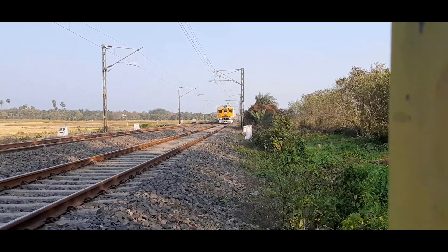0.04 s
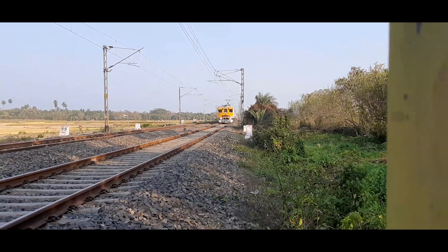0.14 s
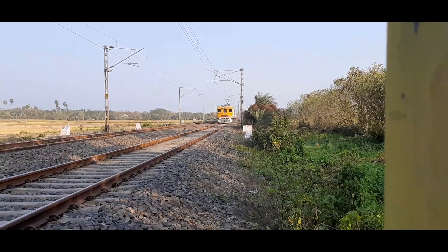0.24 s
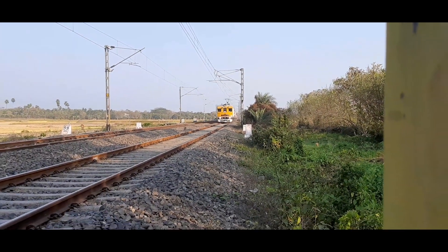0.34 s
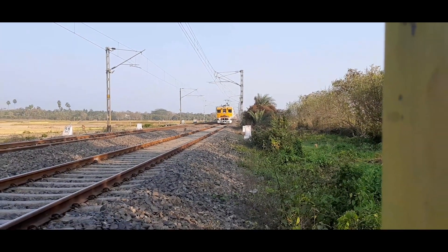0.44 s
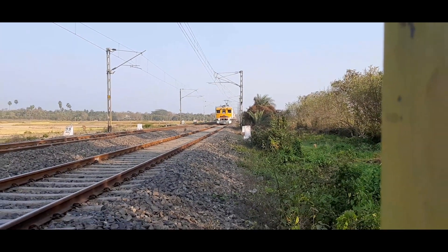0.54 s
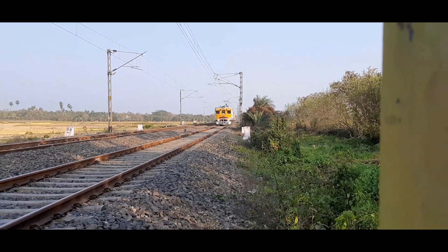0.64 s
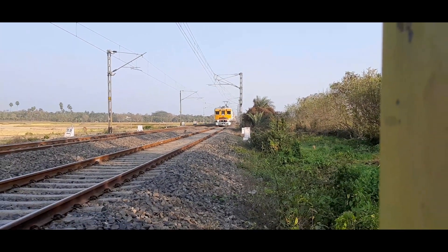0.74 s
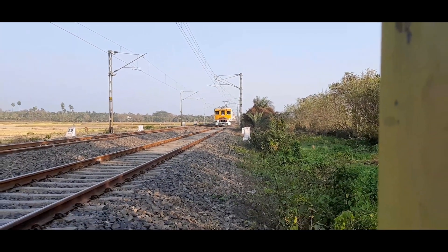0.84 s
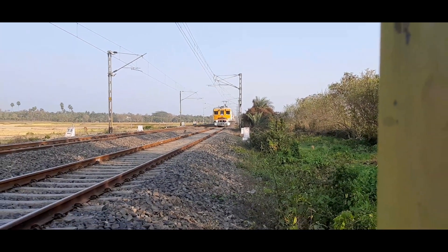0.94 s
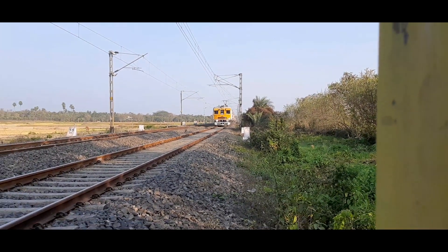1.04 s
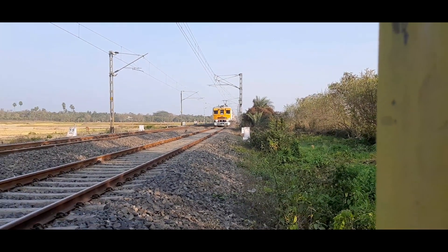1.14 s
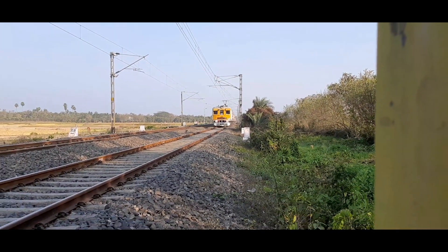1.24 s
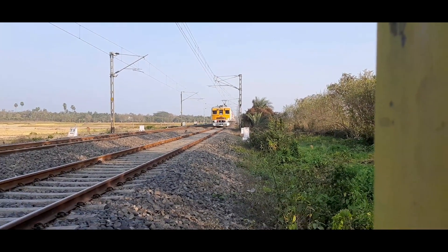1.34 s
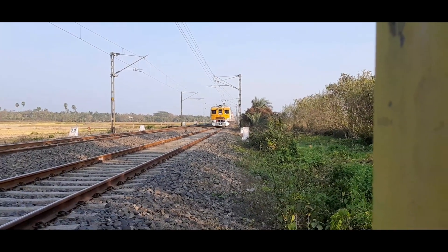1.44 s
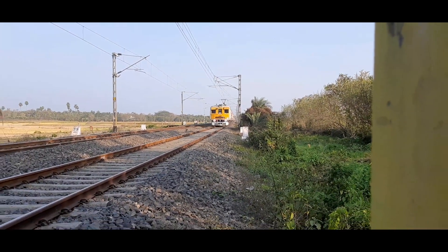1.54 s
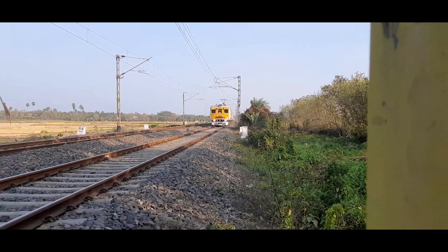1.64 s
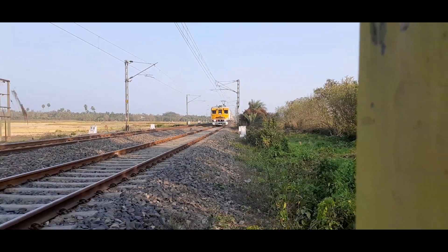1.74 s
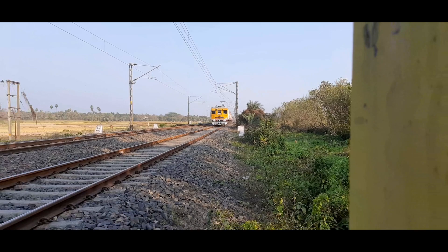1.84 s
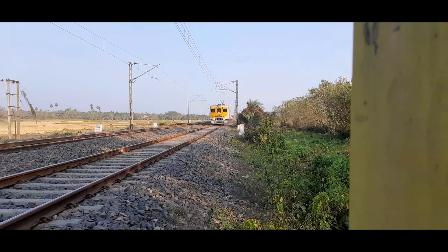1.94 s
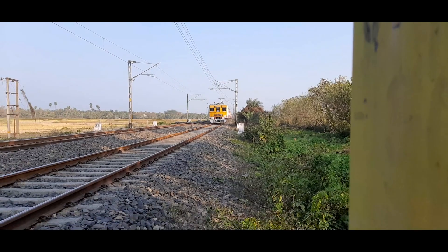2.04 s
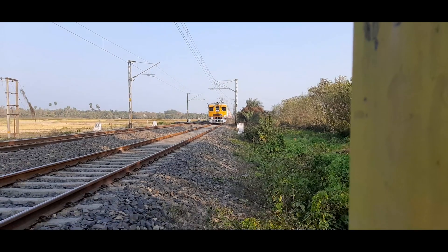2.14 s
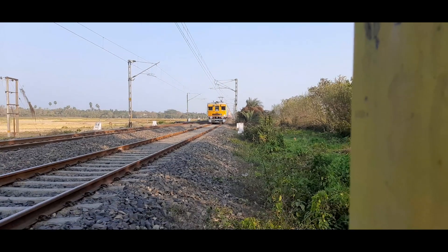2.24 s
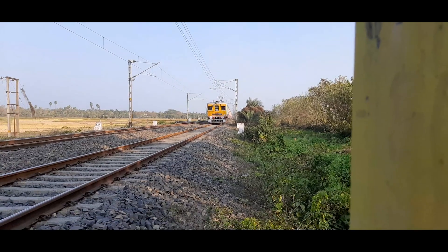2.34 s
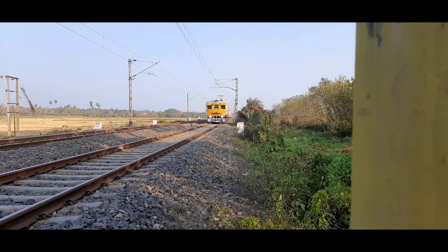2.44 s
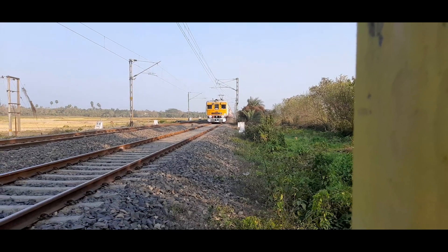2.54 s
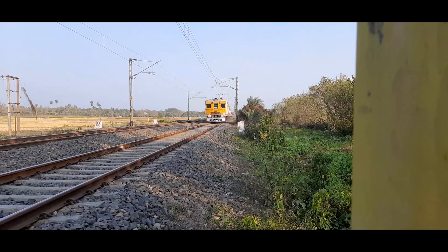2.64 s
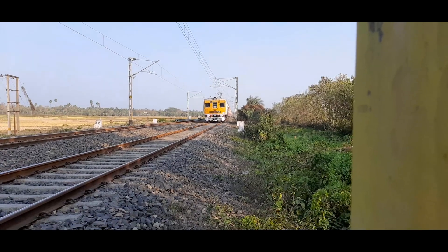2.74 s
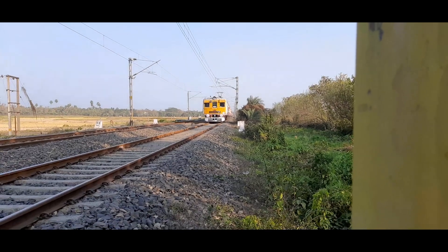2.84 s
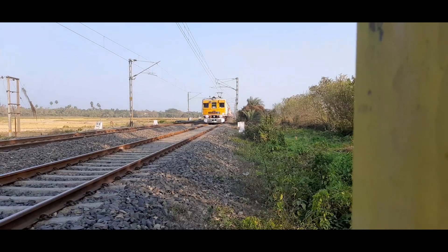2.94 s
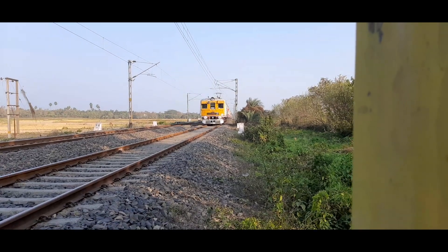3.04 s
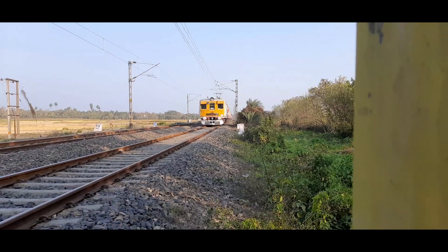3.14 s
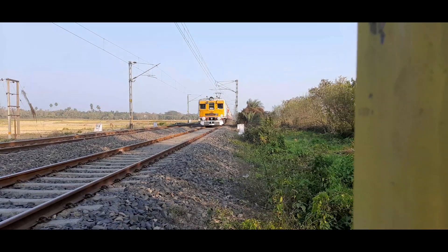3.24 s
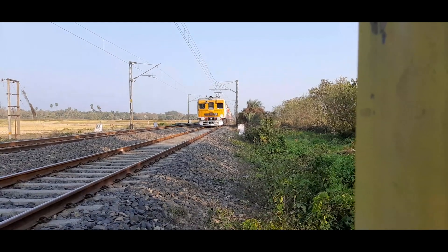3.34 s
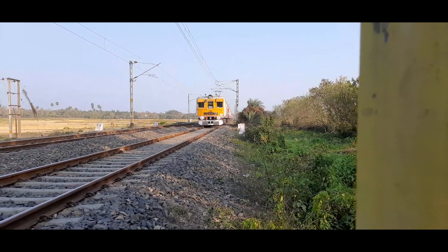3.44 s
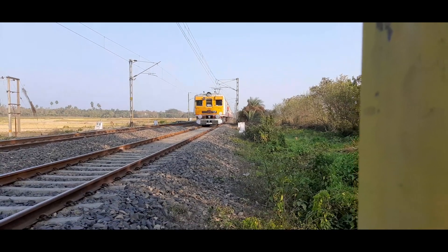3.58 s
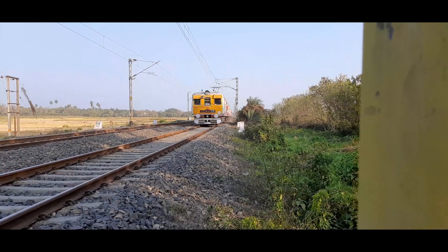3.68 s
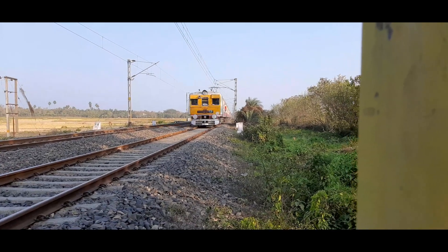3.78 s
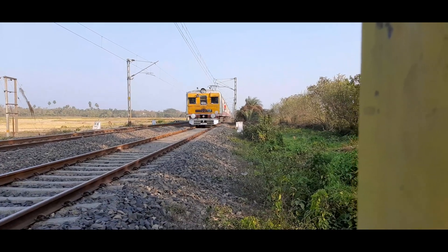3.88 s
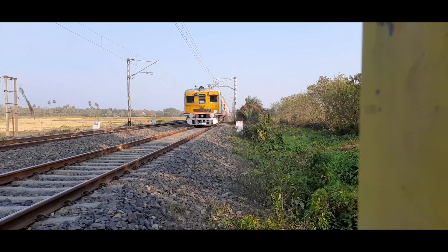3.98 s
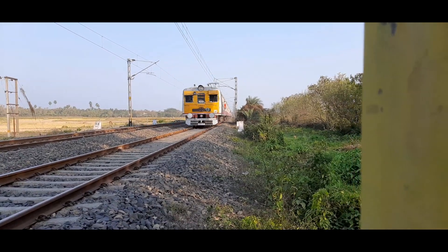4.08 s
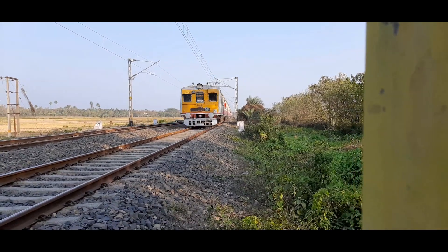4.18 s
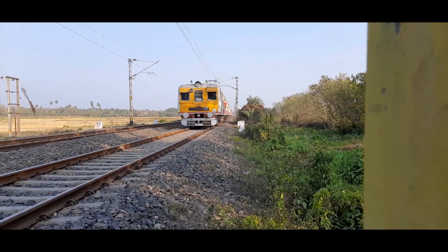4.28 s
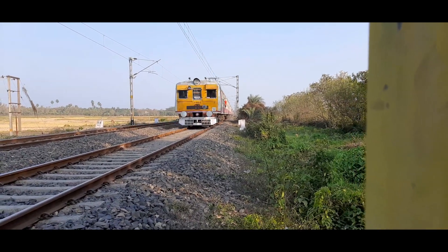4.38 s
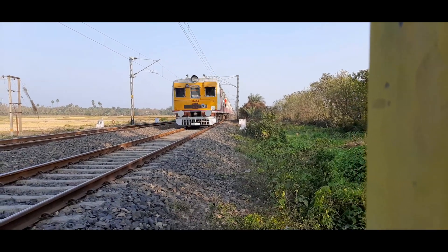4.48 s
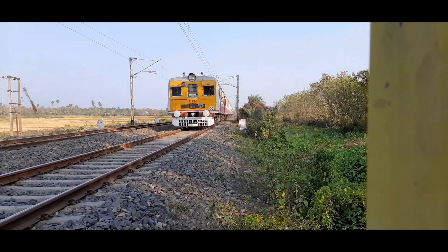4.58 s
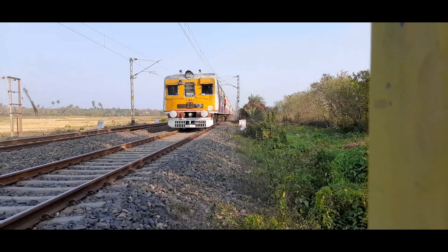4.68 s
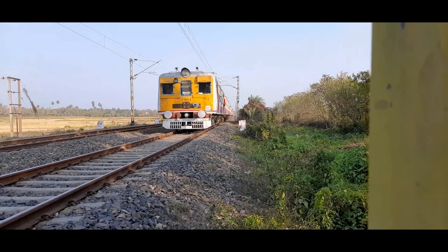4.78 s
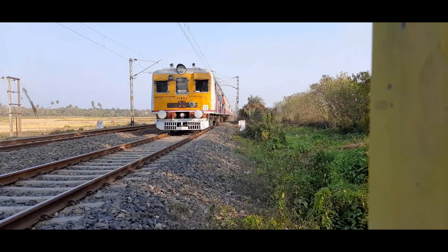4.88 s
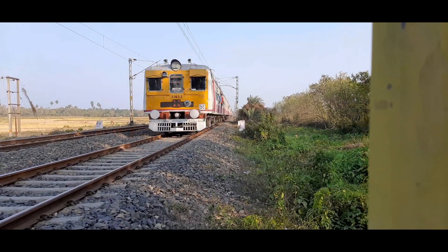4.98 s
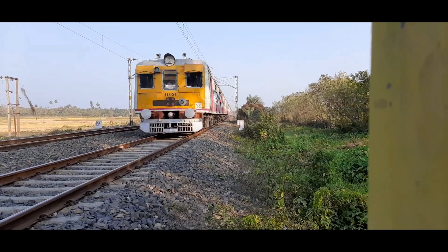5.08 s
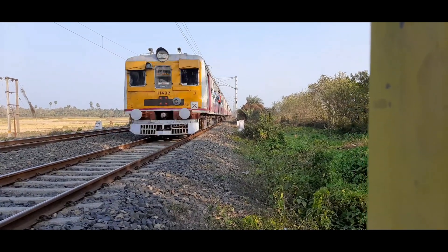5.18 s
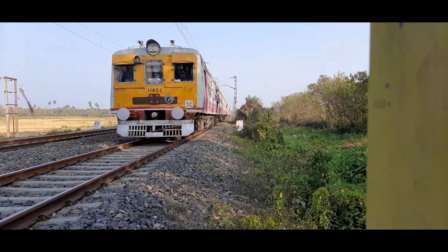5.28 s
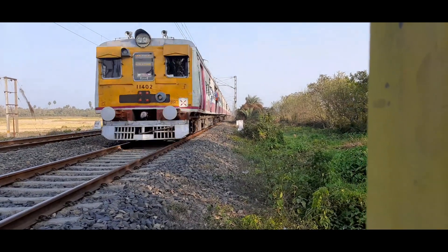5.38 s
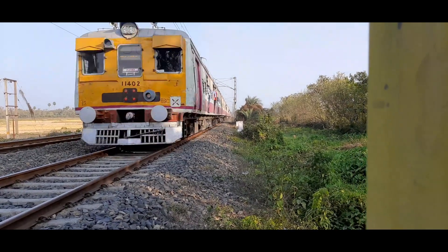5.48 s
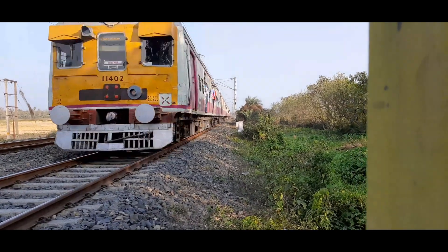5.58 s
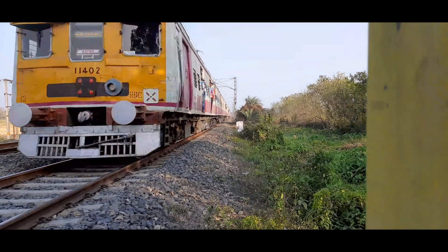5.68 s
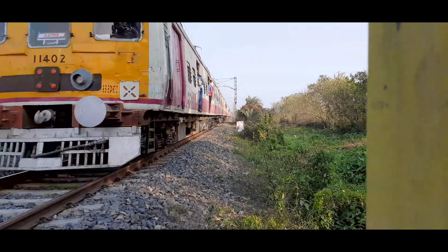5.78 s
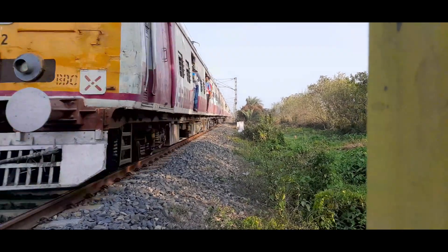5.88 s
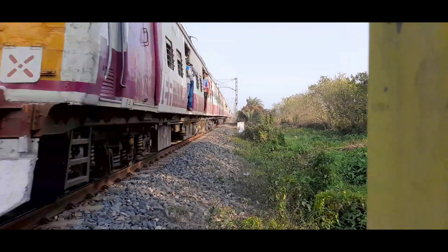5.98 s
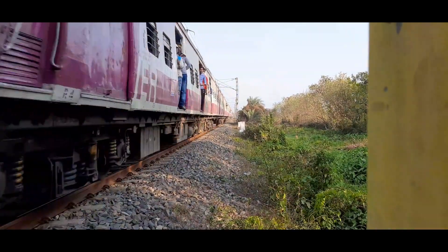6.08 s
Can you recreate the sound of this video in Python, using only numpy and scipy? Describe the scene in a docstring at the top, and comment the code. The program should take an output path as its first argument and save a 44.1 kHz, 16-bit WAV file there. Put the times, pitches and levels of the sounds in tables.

```python
"""An electric train's air horn sounds twice as it comes up fast through open fields: a reed tone with partials.
Its rumble, wheel roll and hiss are shaped noise growing with nearness; pushed air buffets and low tones thud.
Rail joints ring as decaying modes, ticks puff as noise bursts, and a faint steady tone comes and goes.
Birds are gliding whistles with scattered echoes, a dove hoots one pure tone, and insects and far fields are noise.
A handheld recorder with two spaced ports stands about ten metres from the train's path."""
import sys
import numpy as np
from scipy import signal
from scipy.fft import rfft, irfft, next_fast_len
from scipy.io import wavfile
from scipy.ndimage import uniform_filter1d, map_coordinates

SR = 44100
rng = np.random.default_rng(int(sys.argv[2]) if len(sys.argv) > 2 else 0)


def transcribe(signal):
    """Save signal, clipped to [-1, 1], as a 16-bit WAV file at the path in sys.argv[1]."""
    frames = np.atleast_2d(signal).T
    limited = np.clip(frames, -1, 1)
    pcm = np.round(limited * 32767).astype(np.int16)
    wavfile.write(sys.argv[1], SR, pcm)


N = 269892
TIME = np.arange(N) / SR  # s

# Horn blasts, one list each. Each row: time in seconds, fundamental level in dB, left minus right in dB.
HORN_BLASTS = [
    [(2.74, -21, -2), (2.751, -13.5, 0), (2.762, -13, -2.5), (3.15, -16.5, -3), (3.188, -13.5, -1.5),
     (3.294, -11.5, -1.5), (3.544, -11, -1.2), (3.68, -18.5, -6.5), (3.74, -28, -6)],
    [(4.236, -27.5, 0), (4.248, -14, -1.8), (4.26, -11.5, -2.5), (4.33, -10.5, -3.5), (4.562, -12.5, 0),
     (4.84, -11.5, -2.9), (5.334, -12, 0), (5.378, -10, 3.5), (5.472, -12.5, 0.5), (5.514, -22.5, 1)],
]
# Horn overtones against the fundamental. Each row: partial number, level in dB far off, midway, nearer and close,
# extra dB lost per dB of softer blow.
HORN_OVERTONES = [(2, -24, -21, -27, -32.5, 1.5), (3, -27.5, -38, -47.5, -45, 4),
                  (4, -29.5, -34, -35.5, -40.5, 0.3), (5, -48, -56, -45.5, -45, -0.8),
                  (6, -50.5, -67, -41.5, -34.5, 0.2), (7, -54.5, -54.5, -48.5, -29, -0.7),
                  (8, -47.5, -51.5, -40.5, -41.5, 1), (9, -44, -42, -48.5, -42.5, 1.5),
                  (10, -51, -53, -54, -46, 0), (11, -62, -51, -46.5, -42.5, 0.4),
                  (12, -60, -47, -64, -52, 1), (13, -54, -42.5, -42.5, -35.5, 2),
                  (14, -65, -53, -53, -58.5, 2.5), (15, -62, -60, -59.5, -57.5, 1.5),
                  (16, -56, -56, -49, -41.5, 0.5), (17, -71.5, -56, -44.5, -41.5, -0.6),
                  (18, -64, -62, -44.5, -46, -2.3), (19, -64.5, -59, -53, -49.5, 1.5),
                  (20, -79.5, -65.5, -61, -58, -0.5)]
# The lowest horn partials at the two ports. Each row: extra left minus right in dB, left lead in radians.
HORN_AT_PORTS = [(0.5, 0.2646), (6, 2.02), (7.5, 1.1), (4.5, 1.3)]
# Horn pitch before scoop and wander, sagging as the horn draws level. Each row: time in seconds, pitch in Hz.
HORN_PITCH = [(2.7, 761.1), (4.48, 761.5), (4.68, 758.6), (5.5, 757.1)]
# Rumble, rolling and hiss in turn. Each row: level in dB at 10 m, steepness with distance (1 = 1 / distance).
TRAIN_LAYERS = [(-28, 1.8), (-23, 1.196), (-37, 1.155)]
# Level changes over time of the rumble and rolling, dipping under the first blast.
# Each row: time in seconds, far ground rumble in dB, rolling in dB.
TRACK_LEVELS = [(0, 2.2, 2.5), (.27, -1.5, 1), (.97, 1.5, 0), (1.38, -0.8, -1.5), (1.55, 2, 0.6),
                (1.79, 2, 3.5), (1.98, -0.2, -4.5), (2.22, 0.5, 0.5), (2.66, 0.5, 3), (2.9, 1, -1.5),
                (3.24, -4, -1.5), (3.46, -6, -8), (3.68, 0, 1.5), (4.02, 1.5, 3), (4.3, -1.2, 0),
                (4.84, 2, 0), (5.28, 0, 0), (5.6, -5, 1.07)]
# Spectrum shapes of rumble, rolling wheels, hiss and far fields. Each row: frequency in Hz, density in dB per Hz.
RUMBLE_SPECTRUM = [(15, -63.5), (25, -30), (41, -13), (75, 4), (167, -9.5), (188, -7), (227, -15),
                   (260, -25.5), (340, -48), (570, -120)]
ROLLING_SPECTRUM = [(71, -37.5), (120, -2.5), (139, -12.5), (210, -1.5), (254, -2), (304, -6), (459, -7),
                    (527, -17.5), (624, -15.5), (813, -19), (993, -22), (1270, -61), (1500, -32.5),
                    (1950, -61.5), (3300, -120)]
HISS_SPECTRUM = [(590, -24.5), (1000, -2.5), (1270, -12), (1950, -6), (2680, -8.5), (3010, -7),
                 (5220, -11.5), (7200, -14.5), (9590, -22), (10500, -21.5), (14200, -28.5), (15500, -35.5)]
FIELD_SPECTRUM = [(150, -29), (250, 3), (358, -11), (448, 5), (513, -4.5), (748, -1.5), (873, -4),
                  (1020, -5.5), (1820, -12.5), (2610, -15.5), (7300, -26.5), (8670, -43), (10800, -34),
                  (12200, -46.5), (15000, -44.5)]
# How noise reaches the two ports. Each row: frequency in Hz, likeness 0-1, left lead in radians.
PORT_LIKENESS = [(80, 0.93, -.5), (120, 0.92, 0.96), (250, 1, -0.7), (360, 0.4, 0.56), (500, 0.7, 1.5),
                 (880, 0.1, 1.2), (1270, 1, 3.5), (1400, 0.96, 4.5), (2000, 0.04, 4), (3500, 0, 3),
                 (15000, 0, 5.5)]
# Balance of noise between the ports. Each row: frequency in Hz, left minus right in dB.
PORT_TILT = [(60, -0.5), (110, 5.5), (200, -2), (380, 0.5), (700, -1), (1290, -1.0), (2380, 0),
             (4400, -1.5), (8120, 3.5), (15000, 8.5)]
# Low thuds. Each row: start in seconds, level in dB before the onset rounds it, tone in Hz.
LOW_THUMPS = [(3.765, -30.5, 150), (5.633, -16, 251), (5.729, -15.5, 244), (5.799, -16, 246),
              (5.859, -15, 283), (5.936, -14, 261.6), (6.036, -20, 257), (6.084, -17, 226.5)]
# Rail joint blows. Each row: start in seconds, level in dB, lean in dB (upper mode up and lower mode down).
RAIL_JOINTS = [(0.79, -37, 4.5), (1.0615, -42, 10.5), (1.353, -28, 5.5), (1.5412, -24, -1.5),
               (1.6932, -26.5, -1), (1.8796, -34, -12.5), (2.3048, -30, -5.5), (2.4752, -29.5, 1),
               (2.6204, -32, 0.5), (2.662, -31, 3), (3.686, -25, 4.5), (3.7718, -35, 4), (3.873, -28, 2),
               (3.9708, -27.5, -1)]
# Rail modes, upper to lower. Each row: frequency in Hz, level in dB, time to fall 60 dB in seconds.
RAIL_MODES = [(1378, -1.8, 0.062), (1270, -2, 0.057), (1013, -1, 0.081)]
# Thin treble ticks. Each row: start in seconds, level in dB before filtering.
TREBLE_TICKS = [(3.6694, -46.5), (3.8546, -42)]
# Spells of the faint tone. Each row: start in seconds, end in seconds.
WHINE_SPELLS = [(.3, .63), (1.4, 1.68)]
# Bird notes. Each row: start in seconds, length in seconds, first, last and added arch pitch in Hz,
# level in dB before shake and echoes, left minus right in dB.
BIRD_NOTES = [ (.016, 0.042, 3680, 3570, 2, -53, -2), (.141, .113, 3450, 3400, 3, -58, 0),
              (.16, 0.063, 2860, 2950, -2, -55, -9), (.261, .124, 3870, 3820, 0, -53, -5),
              (.268, 0.095, 2700, 2860, 3, -55, 0), (.33, 0.036, 4880, 4900, 0, -56, -6),
              (.42, 0.045, 4290, 4120, -4, -52, -3), (.472, 0.082, 3080, 3186, 285, -47.5, -3),
              (.62, 0.16, 3550, 3550, -1, -56.5, 3), (.746, 0.12, 4660, 4760, 2, -52, 0),
              (.83, 0.14, 2310, 2730, 80, -53.5, -5), (.05, 0.13, 2380, 2430, -0.5, -58, -2),
              (.36, .08, 2400, 2620, -2, -58, -6), (.36, 0.07, 3130, 3440, -1, -54, -2),
              (1.005, 0.1, 4600, 5050, 196, -49, -7), (1.018, 0.041, 2817, 3130, -4, -45, -3),
              (1.045, 0.11, 3150, 3290, 1253, -47.5, -2), (1.072, 0.07, 4350, 4640, -2, -49, 6),
              (1.14, 0.045, 2920, 2820, 0, -44, -4), (1.17, 0.04, 3350, 3360, 150, -50, 7),
              (1.32, 0.19, 3070, 3780, 2, -52.5, -5), (1.42, .13, 3260, 3450, 0, -61, 0),
              (1.47, 0.096, 3630, 3920, -2, -58, 0), (1.4, 0.16, 3160, 3030, 1, -56, -2),
              (1.4, 0.039, 5480, 5340, -2, -54, -6), (1.428, 0.19, 3620, 4440, 197, -50, -2),
              (1.464, .08, 2145, 2400, 4, -53.5, -2), (1.558, .116, 4260, 4100, 1192, -53.5, -3),
              (1.719, .075, 2160, 2310, 3, -53, 3), (1.75, 0.08, 2840, 2805, 1, -46.5, 5),
              (1.93, 0.046, 2550, 2500, 2, -55.5, -8), (2.2, 0.14, 3050, 3180, 3, -53, -6),
              (2.252, 0.066, 2400, 2540, 0.5, -47, 1), (2.3, .05, 3640, 3750, 0, -50, 4),
              (2.348, .052, 3860, 3460, 0, -42, 3), (2.4, .074, 3930, 4220, -1, -57, -3),
              (2.56, 0.12, 2355, 2780, -1.5, -55, -11), (2.704, 0.038, 3760, 3660, -2, -46.5, 6.5),
              (2.719, 0.075, 2390, 2600, -3, -47.5, -5.5), (2.748, 0.11, 5080, 4240, 5.5, -54.5, -2.5),
              (2.889, 0.054, 4850, 5030, 152.5, -43.5, -0.5), (3.59, 0.061, 3920, 5400, 3, -49.5, -2),
              (3.72, 0.12, 3730, 3700, -0.5, -51.5, 0), (4.083, 0.079, 4310, 3680, 299.5, -49, 0.5),
              (4.542, .038, 5000, 4150, -1, -54.5, -2), (4.586, 0.046, 4540, 3760, -2, -51, -2.5),
              (4.65, .028, 4470, 3930, -1, -56, 11), (4.707, .033, 4400, 3870, -14, -54, -2),
              (4.77, 0.027, 4300, 3900, -0.5, -53.5, -7), (5.49, .039, 5000, 4920, -3, -44, 2),
              (5.87, 0.016, 5200, 4970, 2, -36, 3)]
# Rails singing ahead of the train. Each row: frequency in Hz, width in Hz, relative level in dB.
SINGING_BANDS = [(746, 130, -1.5), (1006, 160, 2.5), (1446, 190, -6)]
# Insect fizz. Each row: frequency in Hz, width in Hz, relative level in dB.
INSECT_BANDS = [(10440, 400, -3.5), (11030, 400, 1.5)]

SPEAKS_DB_PER_S, CUTS_DB_PER_S = 1500, 450  # how fast the horn starts and stops
SCOOP_HZ, SCOOP_S = 9, .02  # each blast starts flat and climbs
FULL_DB = -11  # fundamental at full blow
FLARE_DB, FLARE_S = -46, 0.032  # the 3rd partial flares as the valve closes: level, width
FAR_S, MIDWAY_S, NEARER_S, CLOSE_S = 3.8, 4.4, 4.9, 5.3  # when the horn is at those places
SPEED_M_S, ARRIVES_S, ASIDE_M = 27.6, 6.213, 9.5  # front of the train; gap to the recorder as it draws level
GROUND_DB = -40  # rumble that the ground carries from far off, before its level changes
HISS_SHARE = 1  # of the level changes of the rolling
DRAUGHT_DB, DRAUGHT_STEEP = -33.5, 2.3  # pushed air at 10 m, steepness with distance
HOOT_S, HOOT_HZ, HOOT_DB = 3.534, 323, -29.5  # the dove at its loudest, midway between the ports
HOOT_RISE_DB_PER_S, HOOT_FALL_DB_PER_S, HOOT_SPAN_S = 205, 132, 0.15
FIELDS_DB, SINGING_DB, FIZZ_DB = -48, -52.5, -69.0
TOP_HZ = 15700  # top of the sound, in Hz
SIDE = np.array([[.5], [-.5]])  # splits a left minus right difference between the ports


def horn():
    """A reed horn: a strong fundamental and a ladder of partials that fade in and out through stirred air."""
    held_db, pan_db = curves(sum(HORN_BLASTS, []))
    spans = [(rows[0][0], rows[-1][0]) for rows in HORN_BLASTS]
    edges_db = [np.minimum(SPEAKS_DB_PER_S * (TIME - start), CUTS_DB_PER_S * (end - TIME))
                for start, end in spans]
    note_db = np.maximum(held_db + np.minimum(np.max(edges_db, axis=0), 0), -120)

    scoop_hz = sum(SCOOP_HZ * np.exp(-np.abs(TIME - start) / SCOOP_S) for start, _ in spans)
    pitch_hz = curves(HORN_PITCH)[0] - scoop_hz + 0.44 * wobble(30)
    phase = 2 * np.pi * np.cumsum(pitch_hz) / SR

    # overtones stop a little before the fundamental
    overtone_gate = sum(gate(start, end - .04, ramp=.02) for start, end in spans)
    levels = [amp(note_db)]
    for _, *place_dbs, soft in HORN_OVERTONES:
        place_db = np.interp(TIME, [FAR_S, MIDWAY_S, NEARER_S, CLOSE_S], place_dbs)
        levels.append(overtone_gate * amp(note_db + place_db + soft * (held_db - FULL_DB)))
    flare = sum(amp(FLARE_DB) * np.exp(-((TIME - end + 0.047) / FLARE_S) ** 2) for _, end in spans)
    levels[2] = levels[2] + flare

    out = np.zeros((2, N))
    for k, (level, (extra_db, lead)) in enumerate(zip(levels, HORN_AT_PORTS), start=1):
        flutter_db = .5 * k * (wobble(40) + .6 * np.array([wobble(125), wobble(125)]))
        drift = .1 * k * wobble(4)
        tone = np.sqrt(2) * np.sin(k * phase + SIDE * (lead + drift))
        out += level * amp(flutter_db + SIDE * (pan_db + extra_db)) * tone
    for k, level in list(enumerate(levels, start=1))[len(HORN_AT_PORTS):]:
        fading_db = 1.8 * wobble(11) + 2.2 * np.array([wobble(30), wobble(30)])
        lead = 1.4 + .9 * wobble(4)
        tone = np.sqrt(2) * np.sin(k * phase + SIDE * lead + .4 * wobble(40))
        out += level * amp(fading_db + SIDE * 6.4) * tone

    # echoes of a moving horn come back at scattered pitches: a rough band around the note
    dying = amp(-60 * TIME[:SR] / 1.8)
    lingering = signal.fftconvolve(levels[0], dying / dying.sum())[:N]
    rough_tone = np.array([wobble(135), wobble(135)]) * np.sin(phase * .985)
    return out + amp(-16) * lingering * rough_tone


def train():
    """Ground rumble, wheels rolling on steel, and hiss of wheels and air, growing as the train nears."""
    ground_db, wheels_db = curves(TRACK_LEVELS)
    near, rolls, hisses = [amp(db + steep * nearness_db()) for db, steep in TRAIN_LAYERS]
    rumbles = np.hypot(near, amp(GROUND_DB + ground_db))
    throb = wobble(14)  # shared by rumble and rolling
    rumble = rush(lambda hz: amp(along(RUMBLE_SPECTRUM, hz)), patchy_db=1.5)
    rolling = rush(lambda hz: amp(along(ROLLING_SPECTRUM, hz)), patchy_db=.8)
    hiss = rush(lambda hz: amp(along(HISS_SPECTRUM, hz)), patchy_db=1.3)
    rumble_level = rumbles * amp(2.1 * throb)
    rolling_level = rolls * amp(wheels_db + 0.67 * throb + 1.1 * wobble(30))
    hiss_level = hisses * amp(HISS_SHARE * wheels_db + 0.89 * wobble(25))
    return rumble_level * rumble + rolling_level * rolling + hiss_level * hiss


def nearness_db():
    """Gain of 1 / distance to the front of the train, 0 dB at 10 m."""
    distance_m = np.hypot(SPEED_M_S * (ARRIVES_S - TIME), ASIDE_M)
    return -20 * np.log10(distance_m / 10)


def draught():
    """Pushed air: low buffeting, unrelated at the two ports, that grows with nearness."""
    gusts = filtered(rng.standard_normal((2, N)), lambda f: resonance(f, 79, 70) ** 2)
    return amp(DRAUGHT_DB + DRAUGHT_STEEP * nearness_db()) * unit(gusts)


def thumps():
    """Low thuds: a tone that swells at once and dies away."""
    out, t = np.zeros(N + SR), TIME[:SR // 8]
    for s, db, hz in LOW_THUMPS:
        first = round(s * SR)
        swell_and_fall = amp(db - 60 * t / 0.18) * (1 - np.exp(-t / 0.0078))
        out[first:first + len(t)] += swell_and_fall * np.sin(2 * np.pi * hz * t)
    return out[:N] * amp([[-.8], [.8]])


def joints():
    """Each wheel blow rings the rail's modes for a moment; the right port hears it later."""
    out, t = np.zeros((2, N + SR)), TIME[:SR // 10]
    port_phase = np.array([[1.2], [-1.2]])
    for s, db, lean_db in RAIL_JOINTS:
        ring = 0
        for way, (hz, mode_db, t60) in zip((1, 0, -1), RAIL_MODES):
            level = amp(db + mode_db + way * lean_db - 60 * t / t60)
            ring = ring + level * np.sin(2 * np.pi * hz * t + port_phase)
        first = round(s * SR)
        out[:, first:first + len(t)] += ring * (1 - np.exp(-t / 0.0019))
    return outdoors(out[:, :N], t60=.25, wet_db=-12)


def ticks():
    """Short bright puffs of noise, heard about the end of the first blast."""
    out, t = np.zeros((2, N)), TIME[:SR // 20]
    for s, db in TREBLE_TICKS:
        first = round(s * SR)
        out[:, first:first + len(t)] += amp(db - 60 * t / .045) * rng.standard_normal((2, len(t)))
    return filtered(out, lambda f: resonance(f, 7500, 9000))


def whine():
    """A faint tone of steady pitch that comes and goes from the direction of the train."""
    on = sum(gate(start, end, ramp=0.044) for start, end in WHINE_SPELLS)
    tone = np.sin(2 * np.pi * 1555 * TIME + np.array([[.8], [-.8]]))
    return amp(-53 + 1.2 * wobble(24.6)) * on * tone


def birds(count=110):
    """Small birds: nearer notes among echoes, over a faint scattered chorus further off."""
    draw = rng.random((count, 6))
    start = draw[:, 0] * (N / SR - .2)
    length = .04 + 0.12 * draw[:, 1]
    first_hz = 2300 + 2600 * draw[:, 2]
    last_hz = first_hz + 900 * (draw[:, 3] - .5)
    level_db, pan_db = -65 + 6 * draw[:, 4], 8 * (draw[:, 5] - .5)
    chorus = np.transpose([start, length, first_hz, last_hz, np.zeros(count), level_db, pan_db])
    near = whistles(BIRD_NOTES, shake_hz=70)
    far = whistles(chorus, shake_hz=90)
    return outdoors(near, t60=.55, wet_db=0) + outdoors(far, t60=.7, wet_db=3)


def whistles(notes, shake_hz):
    """Gliding whistles, some arched, with unsteady, breathy tone."""
    out = np.zeros((2, N + SR))
    shake, tremble = wobble(160), wobble(70) + wobble(450)
    for start, length, first_hz, last_hz, arch_hz, db, pan_db in notes:
        at = slice(round(start * SR), round((start + length) * SR))
        u = np.linspace(0, 1, at.stop - at.start)  # progress through the note
        glide_hz = first_hz + (last_hz - first_hz) * u + arch_hz * np.sin(np.pi * u)
        hz = glide_hz + shake_hz * shake[at]
        phase = 2 * np.pi * np.cumsum(hz) / SR + rng.uniform(0, 1.6, (2, 1))
        level = amp(db + 2.5 * tremble[at] + SIDE * pan_db)
        out[:, at] += level * np.abs(np.sin(np.pi * u)) ** .5 * np.sin(phase)
    return out[:, :N]


def dove():
    """One soft, pure hoot that swells and fades."""
    swell_db = np.minimum(HOOT_RISE_DB_PER_S * (TIME - HOOT_S), HOOT_FALL_DB_PER_S * (HOOT_S - TIME))
    tone = np.sqrt(2) * amp(HOOT_DB + swell_db) * np.sin(2 * np.pi * HOOT_HZ * TIME)
    on = gate(HOOT_S - HOOT_SPAN_S, HOOT_S + HOOT_SPAN_S, ramp=0.018)
    return tone * on * amp([[-.7], [.7]])


def fields():
    """Far murmur of the open land, rails singing ahead of the train, and two narrow bands of insect fizz."""
    def bands(table):
        return lambda f: sum(amp(db) * np.abs(resonance(f, hz, width)) ** 2 for hz, width, db in table)

    murmur = rush(lambda hz: amp(along(FIELD_SPECTRUM, hz)), patchy_db=.8)
    singing = rush(bands(SINGING_BANDS), patchy_db=-2)
    fizz = rush(bands(INSECT_BANDS), patchy_db=.3)
    return amp(FIELDS_DB) * murmur + amp(SINGING_DB) * singing + amp(FIZZ_DB) * fizz


def outdoors(x, t60, wet_db):
    """Bushes, poles and ground scatter a dying copy to each port."""
    t = np.arange(SR // 2) / SR
    tail = rng.standard_normal((2, len(t))) * amp(-60 * t / t60)
    return x + amp(wet_db) * signal.fftconvolve(x, tail / np.linalg.norm(tail[0]), axes=1)[:, :N]


def rush(gain, patchy_db):
    """Noise at the two spaced ports with patches of random gain; the mean of the ports has rms 1."""
    z = signal.stft(rng.standard_normal((2, N)), nperseg=512)[2]
    over_hz = uniform_filter1d(rng.standard_normal(z.shape[1:]), size=6, axis=0)
    patches = uniform_filter1d(over_hz, size=14, axis=1)
    pair = signal.istft(z * amp(patchy_db * unit(patches)), nperseg=512)[1][:, :N]
    points, likeness, lead = np.transpose(PORT_LIKENESS)

    def alike(hz):
        return np.clip(np.interp(hz, points, likeness), 0, .99)

    def ahead(hz):
        return np.interp(hz, points, lead)

    def middle(hz):  # what is left of the spectrum when the ports are averaged
        return np.sqrt((1 + alike(hz) * np.cos(ahead(hz))) / 2)

    def split(hz):
        return gain(hz) / middle(hz) * np.sqrt([1 + alike(hz), 1 - alike(hz)])

    def lean(hz):
        tilt = amp(np.outer([.5, -.5], along(PORT_TILT, hz)))
        return tilt * np.exp(1j * np.outer([.5, -.5], ahead(hz)))

    shared, own = filtered(pair, split)
    both = filtered(np.array([shared + own, shared - own]), lean)
    return both / np.std(both.mean(axis=0))


def amp(db):
    """Amplitude of a level in dB."""
    return 10 ** (np.asarray(db) / 20)


def unit(x):
    """x scaled to rms 1."""
    return x / np.sqrt(np.mean(x ** 2) + 1e-20)


def along(points, hz):
    """(Hz, value) points joined on a log frequency axis."""
    f, v = np.transpose(points)
    return np.interp(np.log(hz + 1), np.log(f + 1), v)


def curves(rows):
    """One value per sample for each column after the time."""
    s, *cols = np.transpose(rows)
    return [np.interp(TIME, s, c) for c in cols]


def gate(start, end, ramp):
    """1 between two times, with soft edges."""
    return np.clip(np.minimum(TIME - start, end - TIME) / ramp, 0, 1)


def wobble(rate):
    """A smooth random curve, rate knots a second."""
    return map_coordinates(rng.standard_normal(int(N * rate / SR) + 4), [TIME * rate])


def filtered(x, response):
    """x times a complex response of frequency."""
    m = next_fast_len(N + SR // 2)
    return irfft(rfft(x, m) * response(np.fft.rfftfreq(m, 1 / SR)), m)[..., :N]


def resonance(f, hz, width_hz):
    """One causal resonance, gain 1 at its centre."""
    return 1j * f * width_hz / (hz * hz - f * f + 1j * f * width_hz)


def scene():
    """Everything beside the track."""
    passing = horn() + train() + draught() + thumps() + joints() + ticks() + whine()
    return passing + birds() + dove() + fields()


def record(dry):
    """Nothing sounds above TOP_HZ."""
    return filtered(dry, lambda hz: hz < TOP_HZ)


dry = scene()
out = record(dry)
transcribe(out)
```